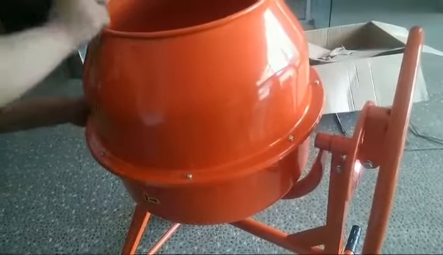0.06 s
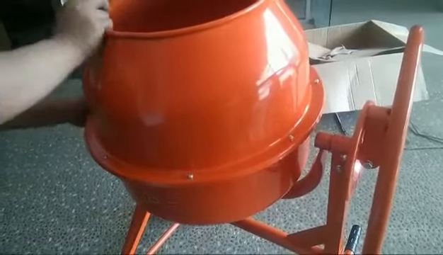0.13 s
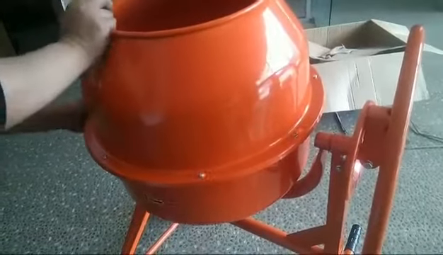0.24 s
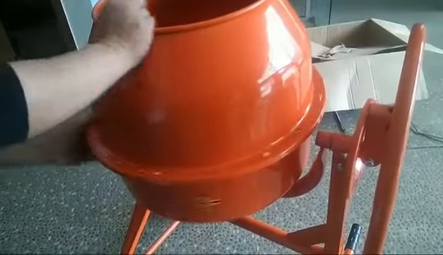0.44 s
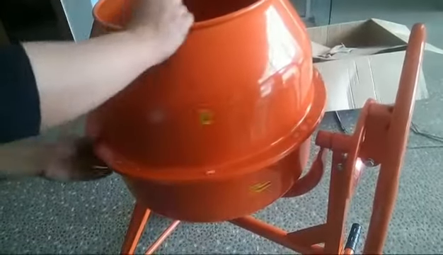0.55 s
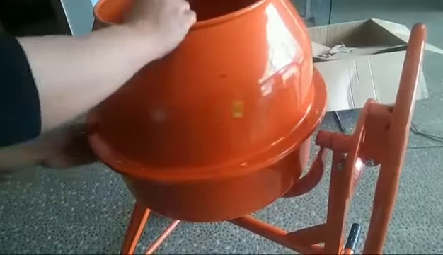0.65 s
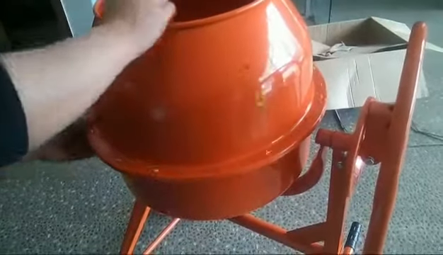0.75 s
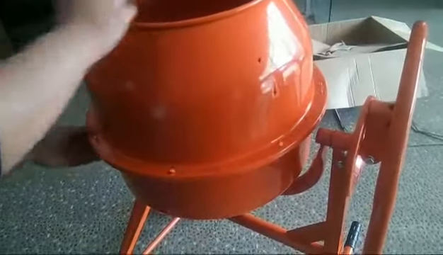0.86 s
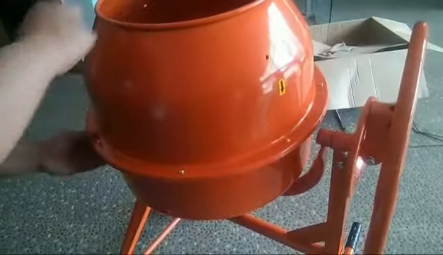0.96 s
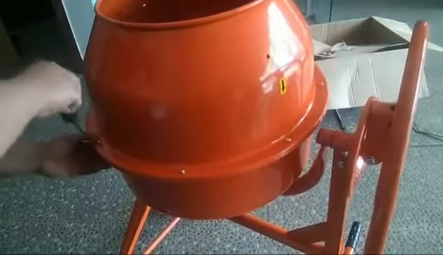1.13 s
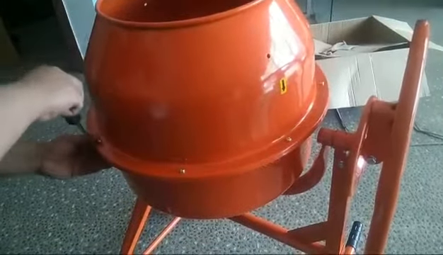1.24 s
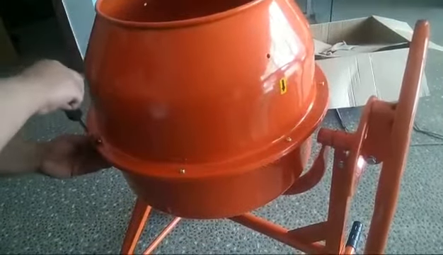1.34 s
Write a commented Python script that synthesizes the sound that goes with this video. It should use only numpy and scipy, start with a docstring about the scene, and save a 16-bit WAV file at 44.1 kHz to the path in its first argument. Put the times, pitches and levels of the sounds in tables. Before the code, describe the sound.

A steel cement mixer drum is turned by hand, scraping and squeaking over a hollow rumble. As it rings out, a hand tool knocks once on the metal and ticks on a bolt, close by in a workshop.

```python
"""Scraping, squeaks and judders over a ringing steel shell and a hollow rumble: a cement mixer drum
turned by hand on its stand in a workshop. The dry bearing sticks and slips and drives the shell's modes;
rolling stirs the hollow, then the drum rings out. A steel hand tool clinks at the start, knocks once
on the flange near the end and ticks on a bolt."""
import sys
import numpy as np
from scipy import signal
from scipy.fft import rfft, irfft
from scipy.io import wavfile
from scipy.ndimage import uniform_filter1d

SR = 44100
rng = np.random.default_rng(int(sys.argv[2]) if len(sys.argv) > 2 else 0)


def log_audio(samples):
    """Write samples as a 16-bit WAV file to the path given in sys.argv[1]."""
    # one column per channel
    frames = np.atleast_2d(samples).T
    # limit to full scale, then quantise
    limited = np.clip(frames, -1, 1)
    pcm = np.round(limited * 32767).astype(np.int16)
    wavfile.write(sys.argv[1], SR, pcm)


N = 61739

# Spectrum of a dry contact. Each row: frequency in Hz, relative level in dB.
CONTACT_SPECTRUM = [(500, -11), (2500, 2), (4500, -2), (8500, -2), (11000, -6), (15000, -11)]


def amp(db):
    """Decibels to gain."""
    return 10 ** (np.asarray(db) / 20)


def clock():
    """Sample times in seconds."""
    return np.arange(N) / SR


def curve(points):
    """Gain over time from (s, dB) points."""
    return amp(np.interp(clock(), *np.array(points).T))


def unit(x):
    """Scale to unit energy."""
    return x / np.sqrt(np.sum(x ** 2))


def through(x, response):
    """Convolve a force with a response."""
    return signal.fftconvolve(x, response)[:N]


def lowpass(x, hz):
    """Second-order low-pass."""
    return signal.sosfilt(signal.butter(2, hz, "low", fs=SR, output="sos"), x)


def highpass(x, hz):
    """Second-order high-pass."""
    return signal.sosfilt(signal.butter(2, hz, "high", fs=SR, output="sos"), x)


def colour(points, size=2048):
    """Minimum-phase response shaped by (Hz, dB) points."""
    hz, db = np.array(points).T
    grid_hz = np.maximum(np.arange(size // 2 + 1) * SR / size, 1)
    magnitude = amp(np.interp(np.log(grid_hz), np.log(hz), db))
    cepstrum = irfft(np.log(magnitude))
    cepstrum[1:size // 2] *= 2
    cepstrum[size // 2 + 1:] = 0
    return unit(irfft(np.exp(rfft(cepstrum))))


def fade(t60_s):
    """Exponential decay."""
    return np.exp(-np.log(1000) * clock() / t60_s)


def tail(t60_s):
    """Diffuse decay with a flattened spectrum."""
    spectrum = rfft(rng.standard_normal(N) * fade(t60_s))
    power = uniform_filter1d(np.abs(spectrum) ** 2, 40)
    flat = irfft(spectrum / np.sqrt(power), N)
    return unit(flat * (clock() < min(t60_s, 1)))


def ring(modes):
    """Response of decaying modes at random phases."""
    return unit(sum(amp(db) * fade(t60_s) * np.sin(2 * np.pi * (hz * clock() + rng.random()))
                    for hz, db, t60_s in modes))


def grit(spread_db):
    """Dense tiny contacts of uneven size, rms 1."""
    noise = rng.standard_normal(N)
    size_db = spread_db * np.repeat(rng.standard_normal(N // 64 + 1), 64)[:N]
    contacts = noise * amp(size_db)
    return contacts / np.std(contacts)


def bursts(rows):
    """Noise bursts with sharp onset and exponential decay."""
    force = np.zeros(N)
    for start_s, db, decay_s in rows:
        age_s = clock() - start_s
        envelope = (age_s >= 0) * np.exp(-np.abs(age_s) / decay_s)
        force += amp(db) * unit(rng.standard_normal(N) * envelope)
    return force


def tap(start_s, db):
    """One hard contact."""
    force = np.zeros(N)
    force[int(start_s * SR)] = amp(db)
    return force


def room(x, near_db, far_db):
    """Add scatter from nearby surfaces and workshop reverberation."""
    scatter = through(x, tail(t60_s=0.092))
    reverb = through(x, tail(t60_s=0.42))
    return x + amp(near_db) * scatter + amp(far_db) * reverb


def workshop_air():
    """Steady, quiet background noise."""
    # Each row: frequency in Hz, relative level in dB.
    spectrum = [(25, -51), (60, 8), (125, 1.5), (400, 1.5), (1100, 3.5), (2200, -6.5), (4000, -14.5),
                (9000, -29.5), (15000, -26)]
    return amp(-37.5) * through(rng.standard_normal(N), colour(spectrum))


def tool_clink():
    """The steel tool pings as the hand takes hold."""
    # Each row: frequency in Hz, relative level in dB, T60 in seconds.
    steel_modes = [(3780, -9.5, 0.14), (6060, -7, 0.26), (6230, -2, .06), (6500, -4, 0.069),
                   (6870, -10, 0.12), (7240, -12, 0.06), (9700, -14, .09)]
    touch = tap(start_s=0.077, db=-13.5)
    ping = through(touch, ring(steel_modes))
    rasp = room(through(touch, colour(CONTACT_SPECTRUM)), near_db=-2.5, far_db=12)
    return amp(8) * ping + amp(-6.5) * rasp


def bolt_tick():
    """The tool touches a bolt: one bright impulse."""
    # Each row: frequency in Hz, relative level in dB.
    spectrum = [(600, -18), (2400, 4), (3500, -26), (4600, -6), (5700, 0), (6600, -3), (7400, 8),
                (8200, 5.5), (9000, -1.5), (12000, -9.5), (15000, -22)]
    tick = through(tap(start_s=1.3167, db=-10.5), colour(spectrum))
    return room(tick, near_db=3, far_db=-1)


def flange_knock():
    """The tool lands with a chattering crack; the flange rings in close, beating mode pairs."""
    # Each row: start in seconds, relative strength in dB, decay time in seconds.
    contacts = [(1.1195, -8, 0.0012), (1.1232, -1.5, 0.0053)]
    # Each row: frequency in Hz, relative level in dB.
    crack_spectrum = [(90, -9), (140, -8), (550, -11), (1050, -9), (1500, -6.5), (2200, 8.5), (2750, -10),
                      (4100, -2.5), (4700, -19.5), (9000, -11), (11000, -20.5), (15000, -26)]
    # Each row: frequency in Hz, relative level in dB, T60 in seconds.
    modes = [(245, -17, .3), (480, -18, .4), (680, -13, .2), (808, -13, .4), (890, -11, .2),
             (1042, 1.5, .12), (1109, -14, .95), (1228, -11, .35), (1795, -18, .55), (2003, -15, .25),
             (2159, -9, .4), (2575, -20, .3), (2977, -13, .2), (3390, -22, .35)]
    crack = room(through(bursts(contacts), colour(crack_spectrum)), near_db=-2, far_db=-3)
    twins = [(hz + 19 * rng.uniform(0.5, 1.95), db - 8, t60_s) for hz, db, t60_s in modes]
    ringing = through(tap(start_s=contacts[0][0], db=9.5), ring(modes + twins))
    return amp(1.5) * crack + ringing


def grip_clicks():
    """Bright dry clicks as the drum is gripped and turned."""
    # Each row: start in seconds, relative strength in dB, decay time in seconds.
    contacts = [(.113, -5.5, 0.0044), (.176, -5.5, 0.0045), (.217, -11, 0.0028), (.243, -6, 0.0044),
                (.256, -4, 0.0084), (.268, -12, 0.0026), (.312, -13, 0.0041), (.352, -4.5, 0.026),
                (.408, -4, 0.0092), (.428, 2, 0.0041), (.449, -14, 0.0042), (.463, -11, 0.0005),
                (.495, -2, 0.00094), (.522, -15, 0.0036), (.586, -12, 0.0035), (.601, -6.5, 0.0011),
                (.657, -29, .004), (.749, -10.5, 0.012), (.89, -21, 0.0026), (1.005, -20, 0.0016)]
    clicks = through(bursts(contacts), colour(CONTACT_SPECTRUM))
    return amp(-9) * room(clicks, near_db=6.5, far_db=2.5)


def drum_hum():
    """Two low drum modes build while it rolls, waver in level, then ring out."""
    # Each row: frequency in Hz, relative level in dB.
    modes = [(125, -0.5), (398.2, 0.5)]
    # Each row: time in seconds, level in dB.
    envelope = [(.25, -49), (.45, -30), (.63, -30.5), (.9, -43.5), (1.15, -46.5), (1.4, -50)]
    waver_db, hum = 2, 0
    for hz, db in modes:
        waver = lowpass(rng.standard_normal(N), hz=7)
        hum += amp(db + waver_db * waver / np.std(waver)) * np.sin(2 * np.pi * hz * clock())
    return curve(envelope) * hum


def hollow_rumble():
    """Rolling stirs the low resonances of the hollow and the stand."""
    # Each row: centre in Hz, half-width in Hz, relative level in dB.
    resonances = [(128.6, 19, 3.5), (181, 17, -6), (244, 21, -3), (279.7, 14, -.5), (308, 96, 2),
                  (389, 21, -14), (493, 290, -12)]
    # Each row: time in seconds, level in dB.
    envelope = [(0, -27), (.09, -47), (.2, -34.5), (.33, -31.5), (.48, -31), (.6, -28), (.72, -30.5),
                (.82, -34), (.95, -35), (1.1, -40.5), (1.4, -50)]
    hz = np.arange(N // 2 + 1) * SR / N
    rumble = 0
    for centre_hz, half_width_hz, db in resonances:
        peak = 1 / (1 + ((hz - centre_hz) / half_width_hz) ** 2)
        band = irfft(rfft(rng.standard_normal(N)) * peak, N)
        rumble += amp(db) * band / np.std(band)
    return curve(envelope) * rumble / np.std(rumble)


def bearing_squeaks():
    """Stick and slip briefly fall into step: short, rough, gliding tones."""
    # Each row: start and length in seconds, start and end pitch in Hz, relative level in dB.
    glides = [(0.266, 0.029, 1766, 1850, -15.5), (0.27, 0.016, 2950, 3000, -23),
              (0.31, 0.019, 2000, 2060, -15), (0.346, 0.018, 1970, 2020, -9.5),
              (0.379, 0.04, 2350, 2372, -20), (0.423, 0.0516, 890, 1057, -15.5),
              (.425, 0.0672, 1530, 1754, -12.5), (0.43, 0.094, 2020, 1978, -15.5),
              (0.474, 0.074, 1560, 1620, -15.5), (0.653, 0.0127, 1450, 1410, -13),
              (0.698, .022, 1040, 1120, -16), (0.736, 0.05, 1075, 1040, -21),
              (0.776, 0.021, 1060, 1044, -22)]
    roughness = 0.9
    squeaks = np.zeros(N)
    for start_s, length_s, from_hz, to_hz, db in glides:
        progress = np.clip((clock() - start_s) / length_s, 0, 1)
        phase = 2 * np.pi * np.cumsum(from_hz + (to_hz - from_hz) * progress) / SR
        waver = lowpass(rng.standard_normal(N) + 1j * rng.standard_normal(N), hz=110)
        tone = np.real(np.exp(1j * phase) * (1 + roughness * waver / np.std(waver)))
        arch = np.sqrt(4 * progress * (1 - progress))
        squeaks += amp(db) * arch * tone
    return amp(-3.7) * room(squeaks, near_db=-12, far_db=-3)


def shell_scrape():
    """Bearing scrape and catch-and-slip judders drive the shell's strong modes and dense finer ones."""
    # Each row: time in seconds, force in dB, treble gain in dB.
    scrape = [(0, -38, 17.5), (.06, -49, 14.5), (.13, -41.5, 5), (.2, -26.5, -7.5), (.264, -20, -3.5),
              (.274, -15.5, 2), (.39, -20.5, 2), (.46, -15, -5.5), (.53, -24.5, 4), (.58, -16.5, 1.5),
              (.635, -22.5, -12), (.68, -18, 2.5), (.73, -26.5, -6.5), (.79, -31, -28), (.83, -27.5, -27),
              (.95, -37, 4), (1.08, -51, 1), (1.4, -93, -39)]
    # Each row: start in seconds, relative strength in dB, decay time in seconds.
    judders = [(.143, -15, 0.012), (.182, -8, 0.0059), (.218, -10, 0.0028), (.269, 5, .004),
               (.3135, 1, 0.0013), (.352, -2, 0.0011), (.358, -1, 0.0021), (.388, -0.5, 0.0025),
               (.411, 1.5, 0.0011), (.429, 4.5, 0.0088), (.449, -1, 0.009), (.459, 4.5, 0.0043),
               (.494, 1, 0.0011), (.52, -4.5, 0.0022), (.565, 0, 0.0088), (.611, 1.5, 0.0025),
               (.637, 0.5, 0.0034), (.6545, 4.5, 0.0013), (.728, -4.5, 0.0052), (.742, 0, 0.0014),
               (.786, -2.5, 0.012)]
    # Each row: frequency in Hz, relative level in dB, T60 in seconds.
    strong_modes = [(738.4, -2, 0.19), (900, -2.5, 0.31), (916, -12, .82), (987, -5, 0.94), (1025, -3, 0.3),
                    (1078, -3, 1.12), (1218, -4.5, 1.8), (1206, -24, 1.8), (1332, -18, 2.4),
                    (1490, -4, 0.81), (1570, -4.5, 0.84), (1600, -15, 0.13), (1782, 0, 0.089),
                    (1989, -4.5, 0.6), (2034, -10.5, 0.22)]
    # Each row: frequency in Hz, relative level in dB.
    fine_mode_spectrum = [(60, -60), (200, -33), (520, -16.5), (720, -4), (1000, -0.5), (1330, -2.5),
                          (1620, -2), (2050, -4), (2400, -8), (3050, -15), (3600, -22.5), (4800, -36),
                          (8500, -32), (15000, -44.5)]
    crossover_hz = 1590
    scrape_gain = curve([(time_s, db) for time_s, db, _ in scrape])
    treble_gain = curve([(time_s, db) for time_s, _, db in scrape])
    force = scrape_gain * grit(spread_db=4) + amp(11.5) * bursts(judders)
    # The crossover's halves are in antiphase, so subtract.
    force = lowpass(force, crossover_hz) - treble_gain * highpass(force, crossover_hz)
    bass_tail = lowpass(tail(t60_s=0.63), crossover_hz)
    treble_tail = highpass(tail(t60_s=0.49), crossover_hz)
    decay = amp(-4.5) * tail(t60_s=0.031) + amp(-3.5) * (bass_tail + treble_tail)
    response = through(decay, colour(fine_mode_spectrum)) + amp(-7.5) * ring(strong_modes)
    return amp(-1) * through(force, response)


def scene():
    """Workshop, drum and tool, in mono."""
    air = workshop_air()
    drum = shell_scrape() + bearing_squeaks() + hollow_rumble() + drum_hum() + grip_clicks()
    tool = flange_knock() + tool_clink() + bolt_tick()
    return (air + drum + tool)[None]


def record(dry):
    """Thin the deep bass, round the peaks, cut the top."""
    low_cut_hz, top_hz = 177, 15600
    rounded = np.tanh(highpass(dry, low_cut_hz))
    return signal.sosfilt(signal.ellip(10, 0.2, 80, top_hz, fs=SR, output="sos"), rounded)


dry = scene()
out = record(dry)
log_audio(out)
```